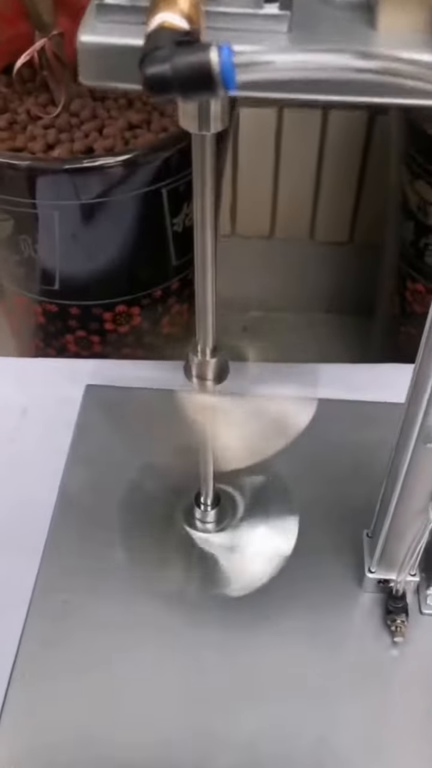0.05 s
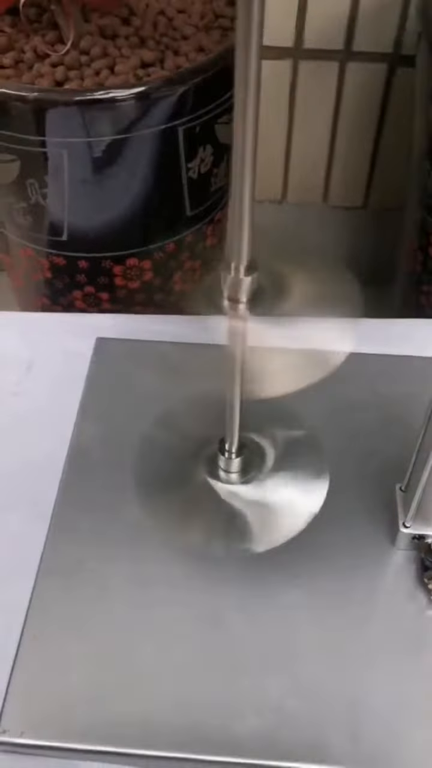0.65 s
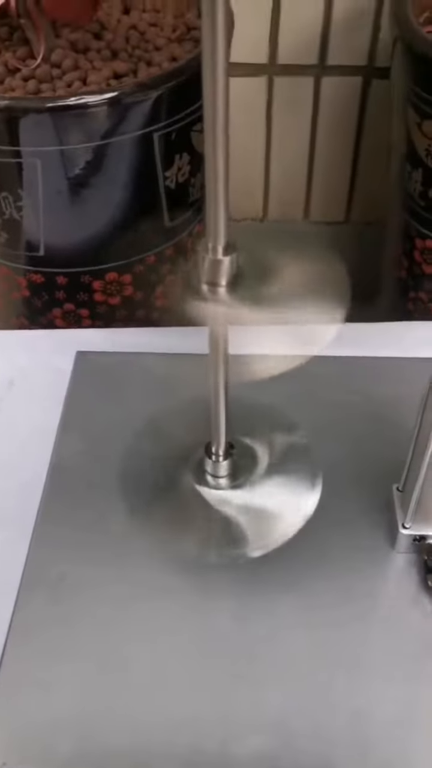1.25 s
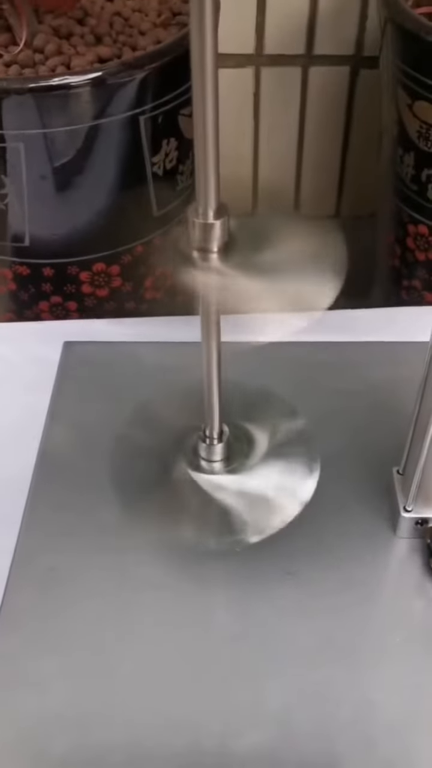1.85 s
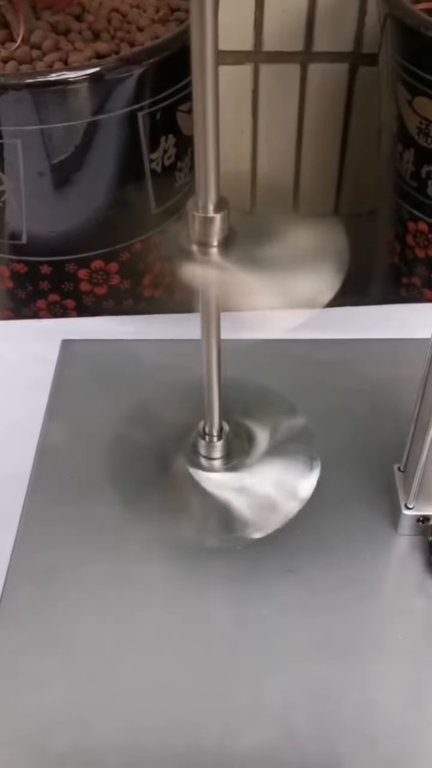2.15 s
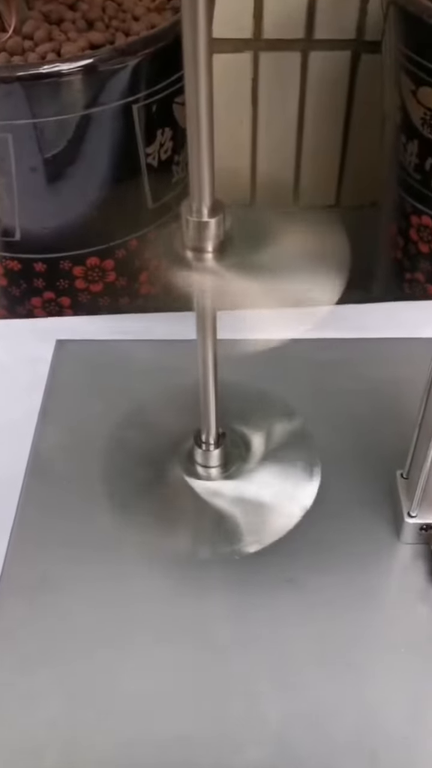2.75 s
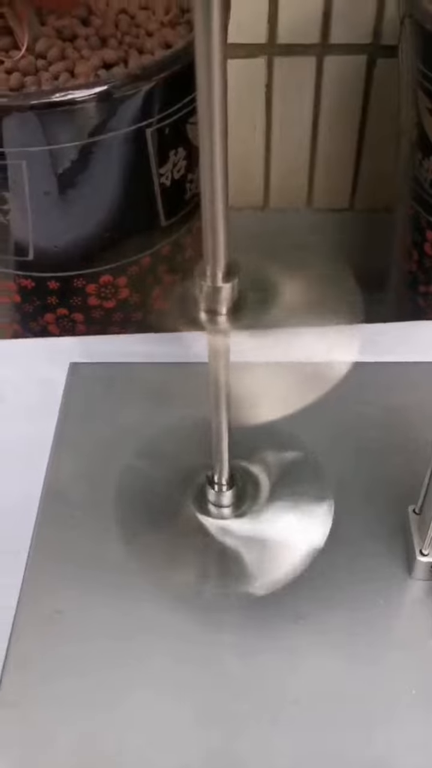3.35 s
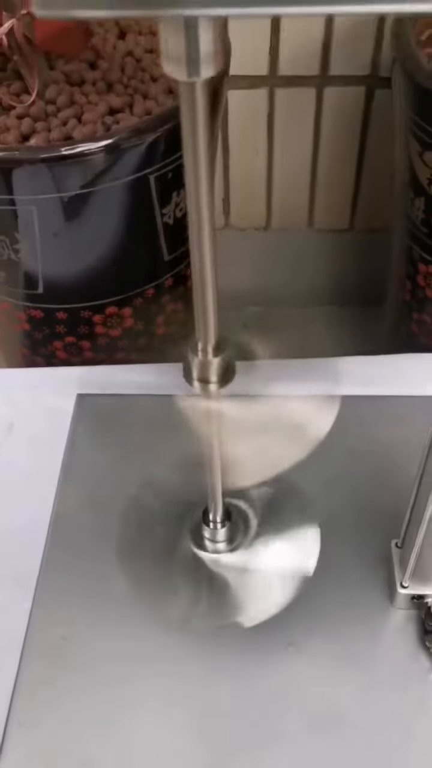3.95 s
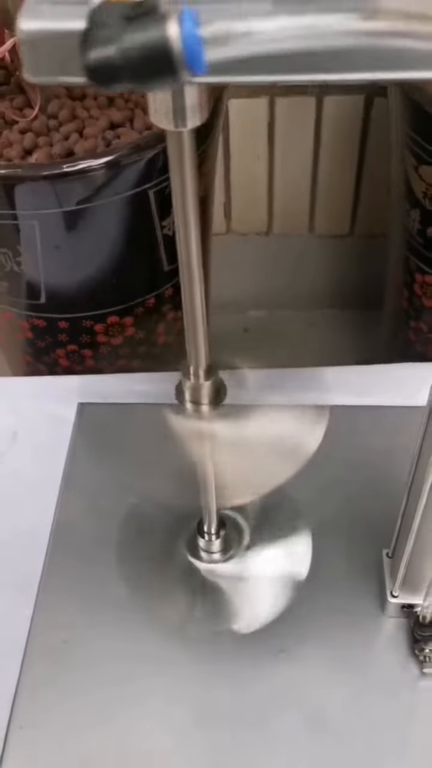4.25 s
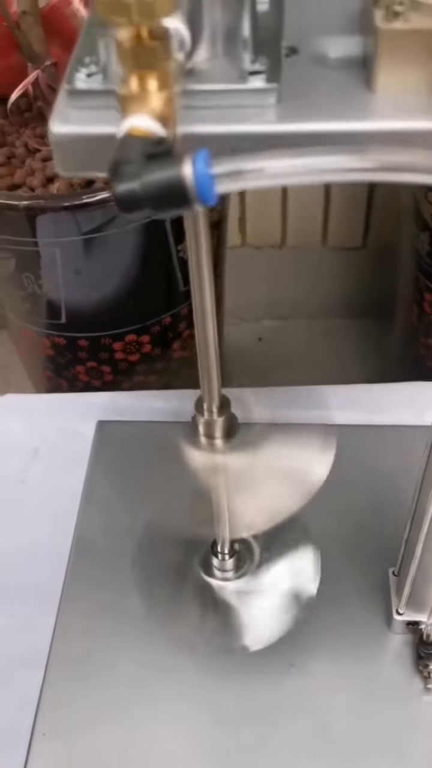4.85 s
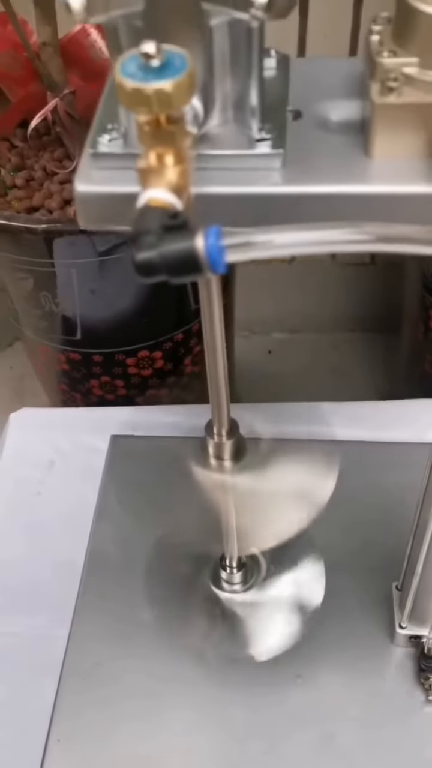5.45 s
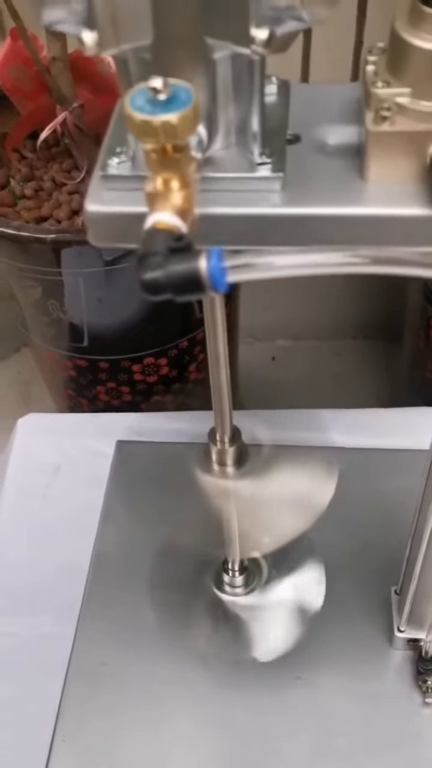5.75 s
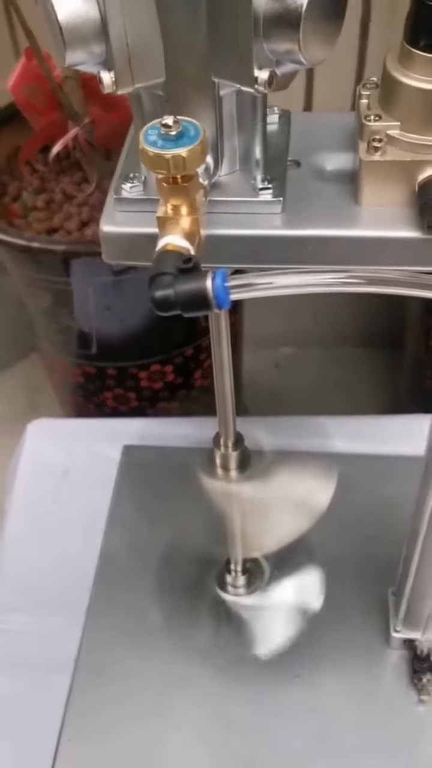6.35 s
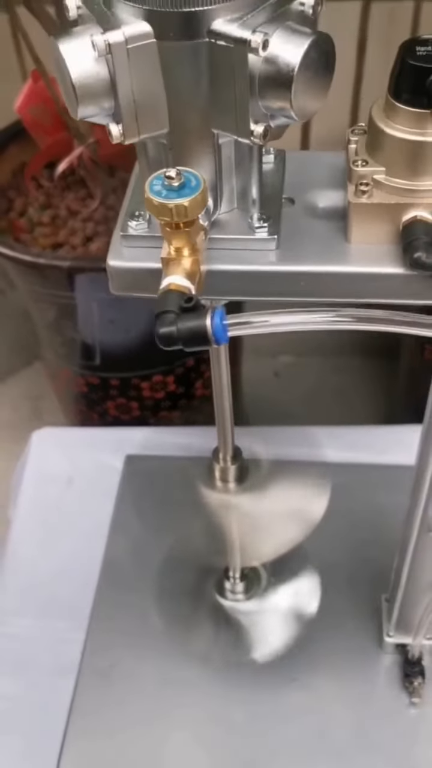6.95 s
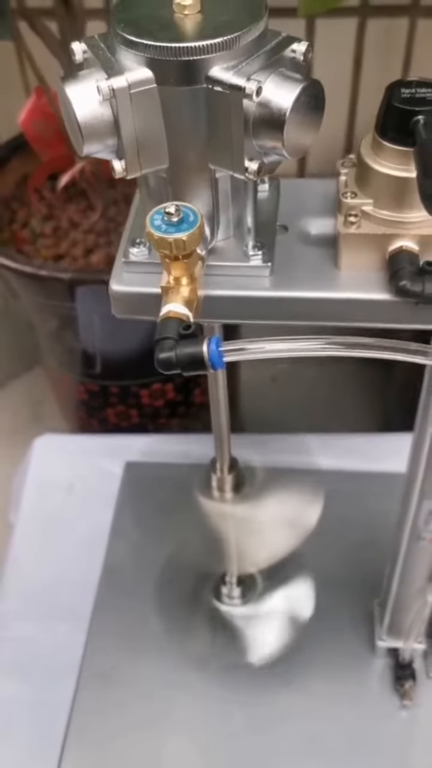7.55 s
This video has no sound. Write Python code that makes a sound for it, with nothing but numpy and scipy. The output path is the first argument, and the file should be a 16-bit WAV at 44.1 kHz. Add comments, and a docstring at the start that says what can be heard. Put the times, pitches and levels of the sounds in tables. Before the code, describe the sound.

An air-driven mixer runs from start to finish, about seven and a half seconds, heard close on a hand-held microphone. The main sound is a steady, bright hiss of exhaust air with faint breathy whistles swelling and fading inside it. Under it are a thin, wavering high whine, a light metallic rubbing and a low hum from the steel stand. The level stays even while the pitch sags very slightly. The whine comes forward around 2 seconds and again from about 6.7 seconds. The hiss shifts in colour as the microphone dips to the propellers until 3 seconds, then rises to the motor. The propellers' draught puffs on the microphone briefly at the start, then repeatedly from 3 seconds on, as low fluttering rumbles. The strongest gusts, with soft thumps, come at about 4.2 to 4.5 seconds and near 6.9 seconds.

```python
"""Air-driven mixer, close up

An air motor spins a two-propeller shaft in free air, slowly losing a little speed. Each turn thumps
the steel stand, the running parts whine and rub, and spent air hisses from the exhaust port.
One hand-held microphone, close in, dips to the propellers and rises to the motor, catching puffs
of their draught and short echoes off the plate, table and stand."""
import sys
import numpy as np
from scipy import signal
from scipy.fft import rfft, irfft
from scipy.io import wavfile
from scipy.ndimage import uniform_filter1d

SR = 44100
rng = np.random.default_rng(int(sys.argv[2]) if len(sys.argv) > 2 else 0)


def int16_out(signal):
    """Quantize to a 16-bit WAV file."""
    q = np.round(np.clip(np.atleast_2d(signal).T, -1, 1) * 32767)
    wavfile.write(sys.argv[1], SR, q.astype(np.int16))


N = 335601

# microphone path: t/s, height (0 below, at the propellers; 1 beside the motor)
MIC_HEIGHT = [(0, 0.31), (.7, 0.31), (1.6, 0.1), (3.0, 0), (3.8, 0.42), (4.6, 0.56), (5.5, 0.795),
              (6.5, 0.9), (7.61, 1)]
# shaft speed, sagging slowly: t/s, turn rate/Hz
SHAFT_SPEED = [(0, 43.87), (.65, 43.5), (2.1, 43.11), (2.9, 42.99), (3.75, 42.71), (4.7, 42.53),
               (5.15, 42.33), (6.5, 41.91), (7, 41.83), (7.61, 41.6)]
# colour of the draught on the microphone: f/Hz, gain/dB
DRAUGHT_COLOUR = [(10, -38), (32, -1.5), (65, -4), (110, -6), (200, -18.5), (350, -21), (700, -61),
                  (2000, -77)]
# puffs that reach the microphone: start/s, length/s, rumble level/dB, flutter level/dB
PUFFS = [(0, 0.014, -42, -40.5), (0.153, 0.21, -56, -56), (2.2, .04, -52, -55), (3.01, 0.303, -52, -58),
         (3.248, 0.1, -49.5, -48), (3.344, 0.027, -44, -42), (3.799, 0.2, -53, -50), (4.19, 0.18, -45, -46),
         (4.407, .12, -50, -45), (4.59, 0.12, -47, -49), (4.876, 0.39, -51, -52),
         (5.554, 0.067, -48, -48.5), (5.716, 0.15, -50.5, -46.5), (6.77, 0.31, -46, -43.5),
         (6.855, 0.038, -45, -42), (7.366, 0.24, -46.5, -49)]
# hard eddies on the diaphragm: t/s, f/Hz, peak level/dB
EDDY_SLAPS = [(4.224, 149, -31), (4.428, 100, -26), (4.503, 51, -33), (4.529, 110, -33),
              (6.871, 140.5, -26.5), (6.878, 320, -35), (6.897, 70, -34)]
# hum of the stand: multiple of the shaft rate, relative level/dB below, halfway up, beside the motor
HUM_PARTIALS = [(1, -62, -62.5, -63), (2, -64, -64.5, -65), (3, -53, -52, -52.5), (4, -56, -56.5, -57.5),
                (5, -56, -57, -58.5), (6, -50.5, -49.5, -49), (7, -61, -62.5, -62), (9, -64.5, -61, -62),
                (10, -67, -64.5, -65), (11, -64.5, -67, -70), (12, -58.5, -57, -66), (13, -68, -68, -67.5),
                (14, -69, -69, -66), (15, -52, -54, -54), (17, -71, -68, -68), (18, -59.5, -58, -52.5),
                (19, -68.5, -63, -58.5), (21, -66.5, -63.5, -63.5), (23, -51.5, -48.5, -51.5),
                (24, -65, -62, -63), (31, -72, -68, -55.5)]
# modes of the rubbed casing: f/Hz, width/Hz, relative level/dB
CASING_MODES = [(1930, 72, -5), (2082, 84, -6), (2159, 137, -0.5), (2400, 117, -8)]
# how strongly the casing rings: t/s, relative level/dB
CASING_RINGING = [(0.05, -36), (1.05, -43), (1.3, -37), (1.49, -44.5), (1.97, -32.5), (2.01, -38.5),
                  (2.66, -40), (3.5, -42), (3.9, -44), (4.0, -38.5), (4.6, -39.5), (5.3, -47.5),
                  (5.85, -41.5), (6.13, -46), (6.69, -33.5), (6.86, -40.5), (7.07, -35), (7.14, -42.5),
                  (7.26, -35.5), (7.55, -36)]
# tones the casing sings with: multiple of the shaft rate, offset from the ringing/dB below, beside
SINGING_TONES = [(50.12, -0.5, -8), (51.14, -3, 2)]
# beamed tones: multiple of the shaft rate, relative level/dB, best height, loss a full height away/dB
BEAMED_TONES = [(25.56, -44.5, .53, 16), (31.96, -46.5, 1, 22), (44.73, -46.5, .15, 15)]
# bearing and rotor tones: multiple of the shaft rate, level before tilt and trim/dB below, beside
BEARING_TONES = [(12.8, -68.0, -72.5), (13.8, -68.5, -59.5), (18.41, -63.0, -64.0), (19.18, -68.0, -60.0),
                 (24.57, -64.5, -65.5), (26.57, -70.5, -55.5), (27.61, -57.5, -59.0), (28.61, -63.5, -64.0),
                 (30.16, -60.5, -71.0), (31.22, -74.0, -56.5), (38.1, -66.0, -63.0), (46.03, -55.0, -61.5),
                 (48.58, -51.0, -57.0), (49.58, -50.5, -63.0), (50.62, -52.5, -53.0), (52.12, -52.5, -50.5),
                 (56.52, -52.5, -61.0), (82.09, -56.5, -62.0)]
# strength of the exhaust: t/s, relative hiss level/dB, relative top-end level/dB
HISS_LEVELS = [(0.1, -36, -2.5), (0.14, -36.5, -3), (0.37, -36.5, -2.5), (0.45, -35, -5),
               (0.96, -35.5, -3.5), (1.6, -35, -3.5), (2.74, -35.5, -4), (3.6, -37.5, -4.5),
               (3.68, -35, -4.5), (3.83, -36, -4.5), (4.24, -35.5, -4), (4.61, -36, -5.5),
               (5.91, -35.5, -6), (7.5, -37, -5)]
# exhaust colour from below and from beside the motor: f/Hz, gain/dB
COLOUR_BELOW = [(60, -48), (220, -5.5), (400, -19), (800, -16), (1200, -7.5), (1450, -10), (2500, -1),
                (3200, -0.5), (4200, -0.5), (5500, -2), (7400, -3), (8600, -7), (11000, -5), (13500, -9.5)]
COLOUR_BESIDE = [(60, -59), (220, -4), (400, -15), (800, -7), (1280, -1), (1440, -11), (1500, -12),
                 (1650, -1), (2400, 4.5), (3000, 1), (3700, -3), (4750, 2), (5350, 2.5), (5900, 2),
                 (7900, 0), (8700, -0.5), (13500, -1.5)]
# resonances of the exhaust port: f/Hz, width/Hz, lift/dB
PORT_MODES = [(1040, 160, 2.5), (1610, 120, 3.5), (3520, 130, 1), (6750, 800, 2.8), (10750, 400, 1.5),
              (11750, 350, 1.5), (13200, 500, 2.5)]
# low rush of the exhaust, strongest halfway up: height, f/Hz, lift/dB
LOW_RUSH = [(0, 960, -1.5), (.5, 1000, 4), (1, 1020, -4)]
# narrow dips in the hiss, one turning into a lift, that shift with microphone height;
# one table each: height, f/Hz, gain/dB
HISS_DIPS = [
    [(0, 1540, -0.5), (.33, 1380, -7.5), (.5, 1370, -2.5), (.8, 1680, -9), (1, 1690, -15.5)],
    [(0, 2640, -6.5), (.3, 2750, -6), (.5, 2400, -2), (1, 2500, -5.5)],
    [(0, 3250, -27), (.1, 3200, -16), (.2, 3420, -8), (.48, 2770, -4), (.9, 2790, -16), (1, 2930, -11)],
    [(0, 3660, -8), (.3, 3700, -5), (.5, 3250, -2), (.85, 3200, -7), (1, 3160, -10)],
    [(0, 5000, -2), (.3, 4800, -1), (.5, 4960, -13), (1, 5660, -2)],
    [(0, 4280, -0.5), (.3, 4300, -3), (.5, 3800, 3), (1, 3400, 4)],
]
# breathy whistles that swell and fade in the jet: middle/s, length/s, f/Hz, width/Hz, lift/dB
JET_WHISTLES = [(0.49, 0.44, 6700, 150, 9.5), (1.3, 1.0, 6950, 130, 8.5), (2.2, 1.2, 6780, 100, 8),
                (1.7, 0.77, 6600, 90, 0), (2.88, 0.89, 6250, 123, 9), (2.87, 0.4, 6900, 163, 2),
                (3.35, .3, 9100, 200, 10), (3.544, 0.39, 6560, 130, 6), (3.97, 0.46, 9120, 200, 9),
                (4.12, 0.32, 6900, 119, 7), (4.35, 0.65, 5820, 280, 8), (4.5, 0.76, 3530, 130, 4),
                (2.3, 1.2, 3540, 110, 3.5), (4.988, 0.13, 9200, 180, 13.5), (5.6, 0.84, 6620, 131, 7),
                (6.35, 1, 6720, 130, 6.5), (6.905, 0.4, 5700, 150, 5), (7.45, 0.44, 6830, 160, 7)]


def undb(db):
    """Decibels to gain."""
    return 10 ** (np.asarray(db) / 20)


def lookup(table, at):
    """The later columns of a table, read at these values of its first."""
    keys, *columns = np.transpose(table)
    return [np.interp(at, keys, column) for column in columns]


def curves(table):
    """The columns of a timed table, one value a sample."""
    return lookup(table, np.arange(N) / SR)


def bins():
    """Frequencies of the spectrum, from 1 Hz up."""
    return np.maximum(np.arange(N // 2 + 1) * SR / N, 1)


def colour_db(points, hz):
    """Gain/dB of a colour table, read along a log frequency axis."""
    point_hz, db = np.transpose(points)
    return np.interp(np.log(hz), np.log(point_hz), db)


def bell(hz, centre, width):
    """Resonance shape, 1 at its centre."""
    return 1 / (1 + (2 * (hz - centre) / width) ** 2)


def walk(rate):
    """Smooth random drift of spread 1 that changes about rate times a second."""
    hz = np.arange(N + 1) * SR / (2 * N)
    drift = irfft(rfft(rng.standard_normal(2 * N)) / (1 + (hz / rate) ** 4))
    return drift[:N] / drift.std()


def patches(shape, bands, frames):
    """Smooth random field of spread 1, in patches so many bands high and frames long."""
    field = rng.standard_normal(shape)
    for _ in range(2):
        field = uniform_filter1d(field, size=bands, axis=0)
        field = uniform_filter1d(field, size=frames, axis=1)
    return field / field.std()


def noise(colour, band_hz):
    """Coloured noise with rms 1 inside the band."""
    spectrum = rfft(rng.standard_normal(N)) * undb(colour_db(colour, bins()))
    inside = (bins() > band_hz[0]) & (bins() < band_hz[1])
    return irfft(spectrum, N) / irfft(spectrum * inside, N).std()


def surface_echoes(sound, height, count=18, lags_s=(.002, .011), slide_s=.0009, echo_db=-10):
    """Small surfaces close by throw back only the treble; the lags slide as the microphone moves."""
    t = np.arange(N) / SR
    treble = signal.sosfilt(signal.butter(2, 1960, "high", fs=SR, output="sos"), sound)
    echoes = 0
    for lag, (shift, slide) in zip(np.geomspace(*lags_s, count), rng.standard_normal((count, 2))):
        delay = lag + slide_s * (shift / 10 + slide * (height - .5))
        echoes += np.interp(t - delay, t, treble)
    return sound + undb(echo_db) * echoes / np.sqrt(count)


def draught(attack_s=.0058, release_s=.042, calm_db=-66, rumble_below_hz=35):
    """Propeller eddies buffet the microphone: each puff holds and dies away over a faint stir."""
    t = np.arange(N) / SR
    power = undb(calm_db) ** 2
    for start, length, *levels_db in PUFFS:
        rise = np.clip((t - start) / attack_s, 0, 1)
        fall = np.exp(-np.maximum(t - start - length, 0) / release_s)
        power = power + np.outer(undb(levels_db), rise * fall) ** 2
    rumble_gain, flutter_gain = np.sqrt(power)
    eddies = noise(DRAUGHT_COLOUR, band_hz=(20, 110))
    rumble = irfft(rfft(eddies) / (1 + (bins() / rumble_below_hz) ** 8), N)
    return rumble_gain * rumble + flutter_gain * (eddies - rumble)


def eddy_slaps(cycles=.26):
    """A hard eddy shoves the diaphragm, which swings back and settles within a cycle."""
    out = 0
    for middle, hz, db in EDDY_SLAPS:
        swing = (np.arange(N) / SR - middle) * hz
        out += undb(db) * np.cos(2 * np.pi * swing) * np.exp(-(swing / cycles) ** 2)
    return out


def stand_hum(turns, height, trim_db=.38):
    """One push a turn: low partials throb in step, the stand scatters and shakes the upper ones."""
    out = 0
    for order, *levels_db in HUM_PARTIALS:
        scatter = min((order / 12) ** 3, 1)
        shake = .007 * order * walk(30)
        phase = 2 * np.pi * (order * turns + scatter * rng.random()) + shake
        waver_db = .4 * walk(1) + .45 * walk(14)
        db = np.interp(height, (0, .5, 1), levels_db) + trim_db + waver_db
        out += undb(db) * np.sin(phase)
    return out


def casing_rub(turns, height, ringing_db, ticks_per_s=650, scatter_db=2.5, uneven_db=2.5):
    """Irregular ticks of the rubbing parts, harder once and twice a turn, ring the motor casing."""
    modes = sum(undb(db) / (1 + 2j * (bins() - hz) / width) ** 2 for hz, width, db in CASING_MODES)
    ticks = rng.random(N) < ticks_per_s / SR
    strength = undb(scatter_db * rng.standard_normal(N) + uneven_db * walk(28))
    pressure = 1 + .15 * np.cos(2 * np.pi * turns) + .16 * np.cos(4 * np.pi * turns)
    rub = irfft(rfft(ticks * strength * pressure) * modes, N)
    level_db = np.interp(height, (0, 1), (-43.2, -50)) + .12 * (ringing_db - ringing_db.mean())
    return undb(level_db) * rub / rub.std()


def running_tone(turns, order, flutter):
    """Play in the bearings shakes a tone's phase and level, more so on high orders."""
    slip = .0013 * order * walk(2.8)
    rattle = 1 + flutter * order * walk(55)
    return rattle * np.cos(2 * np.pi * (order * turns + rng.random()) + slip)


def motor_whine(turns, speed, height, ringing_db, casing_hz=2162, casing_width_hz=107):
    """Two tones sing as the slowing shaft slides them through a casing resonance, among rougher ones."""
    sing_trim_db, beam_trim_db, bearing_trim_db, tilt_db_per_order = -1.1, -.3, .7, -.037
    out = 0
    for order, *levels_db in SINGING_TONES:
        surge_db = 1.5 * walk(7)
        db = ringing_db + np.interp(height, (0, 1), levels_db) + sing_trim_db + surge_db
        resonance = bell(order * speed, casing_hz, casing_width_hz)
        out += undb(db) * resonance * running_tone(turns, order, flutter=.0028)
    for order, level_db, best_height, loss_db in BEAMED_TONES:
        db = level_db + beam_trim_db - loss_db * abs(height - best_height)
        out += undb(db) * running_tone(turns, order, flutter=.0045)
    for order, *levels_db in BEARING_TONES:
        db = np.interp(height, (0, 1), levels_db) + bearing_trim_db + tilt_db_per_order * order
        swell_db = 1.5 * walk(.7)
        out += undb(db + swell_db) * running_tone(turns, order, flutter=.0062)
    return out


def jet_colour_db(hz, t, height, rush_width_hz=220, dip_width_hz=140):
    """The jet from where the microphone is: port resonances, low rush, narrow dips and whistles."""
    below, beside = colour_db(COLOUR_BELOW, hz), colour_db(COLOUR_BESIDE, hz)
    db = below + (beside - below) * height
    db += sum(lift * bell(hz, centre, width) for centre, width, lift in PORT_MODES)
    for table, width in [(LOW_RUSH, rush_width_hz)] + [(dip, dip_width_hz) for dip in HISS_DIPS]:
        centre, lift = lookup(table, height)
        db += lift * bell(hz, centre, width)
    for middle, length, centre, width, lift in JET_WHISTLES:
        swell = .5 ** ((2 * (t - middle) / length) ** 2)
        db += lift * bell(hz, centre, width) * swell
    return db


def exhaust_hiss(turns, height, top_hz=8200, top_lift_db=3, ribs_db=1.3, flutter_db=1.1, trim_db=-.02):
    """Spent air hisses through the port, pulsing a little unevenly once and three times a turn."""
    hz, t, spectra = signal.stft(rng.standard_normal(N), SR, nperseg=1024, noverlap=768)
    hz = np.maximum(hz, 1)[:, None]
    now = np.minimum(t * SR, N - 1).astype(int)
    hiss_db, top_db = curves(HISS_LEVELS)
    db = jet_colour_db(hz, t, height[now])
    # the top of the jet flickers with its turbulence
    flicker_db = .98 * walk(25)
    db += (top_db + top_lift_db + flicker_db)[now] / (1 + (top_hz / hz) ** 12)
    # the hand moves through a ribbed sound field and each band flutters; short waves do both most
    ribs = ribs_db * patches(db.shape, bands=3, frames=56)
    flutter = flutter_db * patches(db.shape, bands=7, frames=3)
    db += np.minimum(hz / 3000, 1) * (ribs + flutter)
    steady_band = (hz > 3600) & (hz < 8000)  # keeps its power while the colour shifts
    gain = undb(db) / np.sqrt(np.mean(undb(db) ** 2 * steady_band, axis=0))
    hiss = signal.istft(spectra * gain, SR, nperseg=1024, noverlap=768)[1][:N]
    flow = 1 + .039 * np.cos(2 * np.pi * turns) + .059 * np.cos(6 * np.pi * turns) + .06 * walk(24)
    return hiss * flow * undb(hiss_db + trim_db)


def scene():
    """One shaft paces the motor's sounds; one close, moving microphone feeds both channels."""
    speed, = curves(SHAFT_SPEED)
    turns = np.cumsum(speed) / SR
    height, = curves(MIC_HEIGHT)
    ringing_db, = curves(CASING_RINGING)
    hiss_and_rub = exhaust_hiss(turns, height) + casing_rub(turns, height, ringing_db)
    mono = surface_echoes(hiss_and_rub, height)
    mono += stand_hum(turns, height) + motor_whine(turns, speed, height, ringing_db)
    mono += draught() + eddy_slaps()
    return np.array([mono, mono])


def record(dry, cutoff_hz=13800):
    """The recorder cuts the top steeply."""
    return signal.sosfilt(signal.ellip(12, .1, 90, cutoff_hz, fs=SR, output="sos"), dry)


dry = scene()
out = record(dry)
int16_out(out)
```